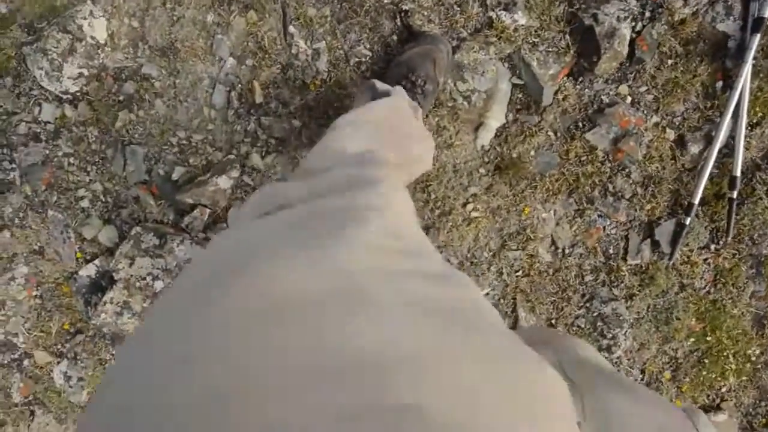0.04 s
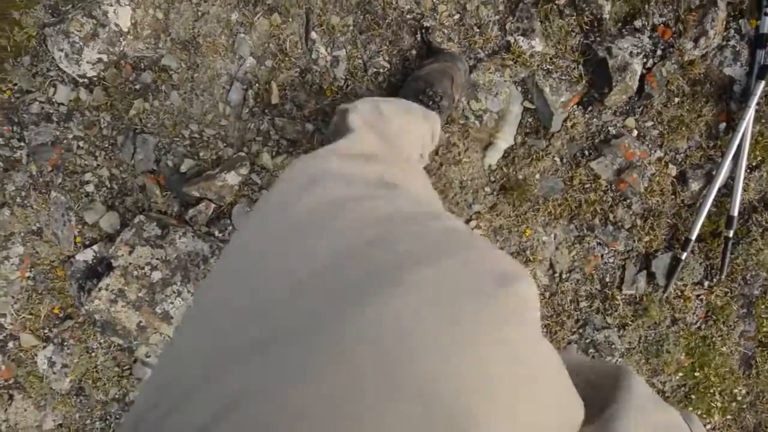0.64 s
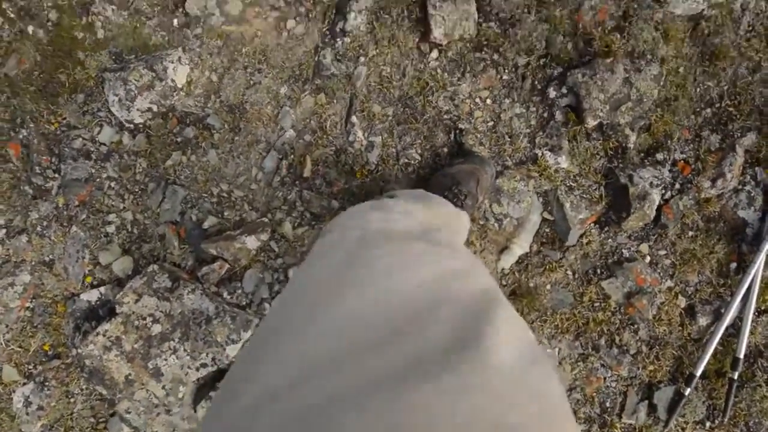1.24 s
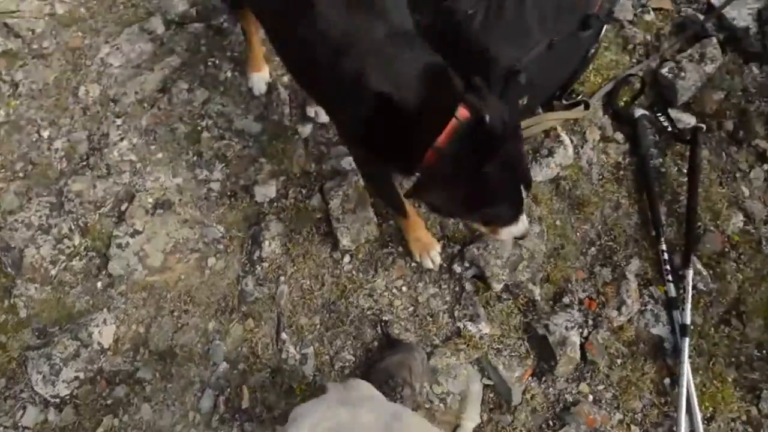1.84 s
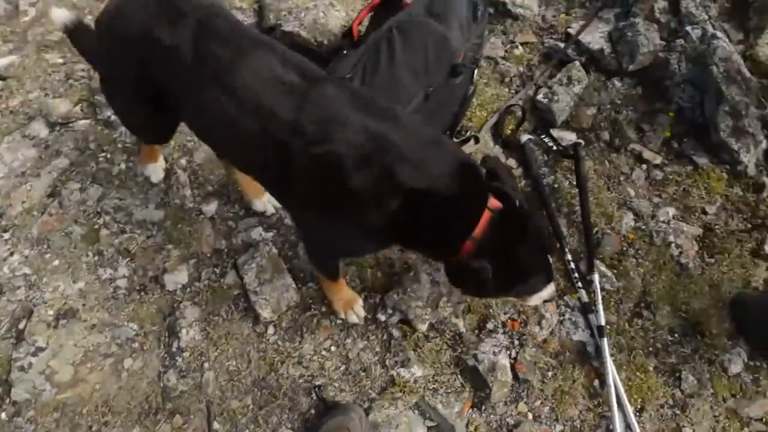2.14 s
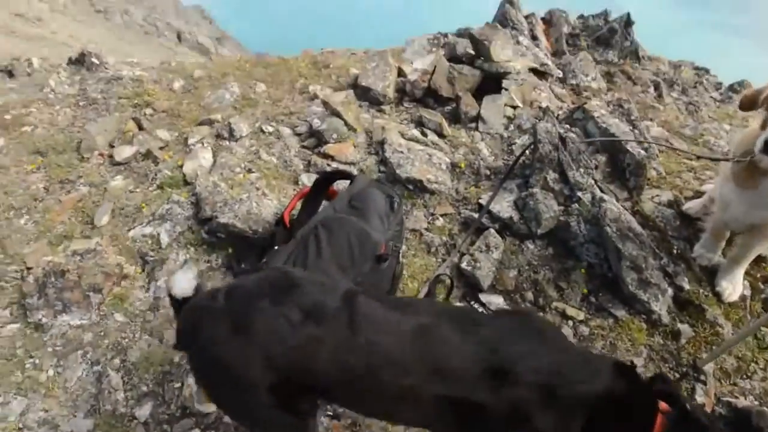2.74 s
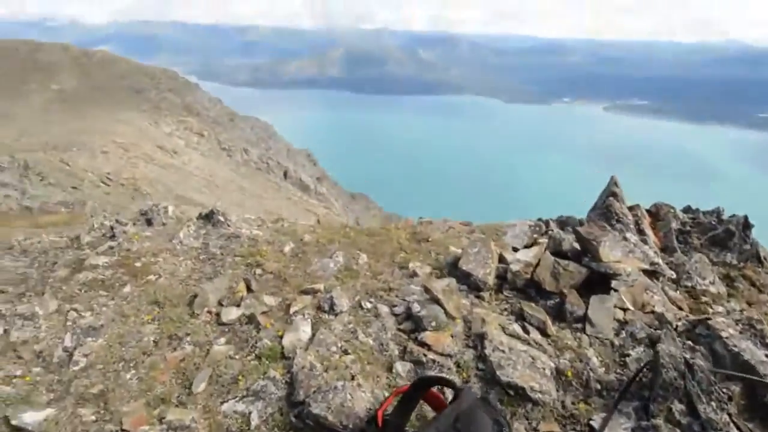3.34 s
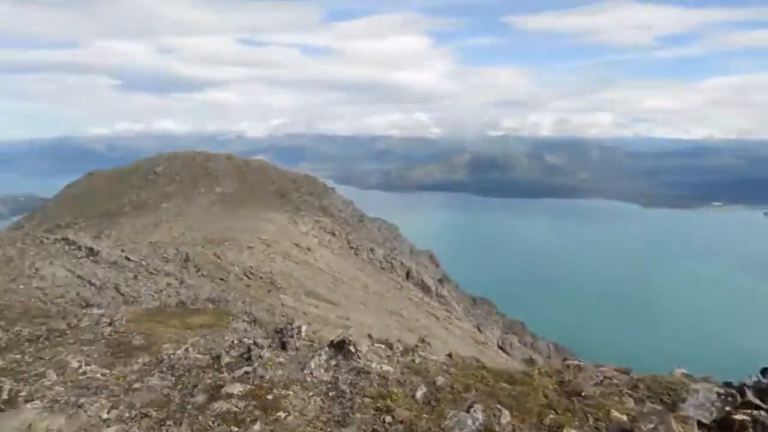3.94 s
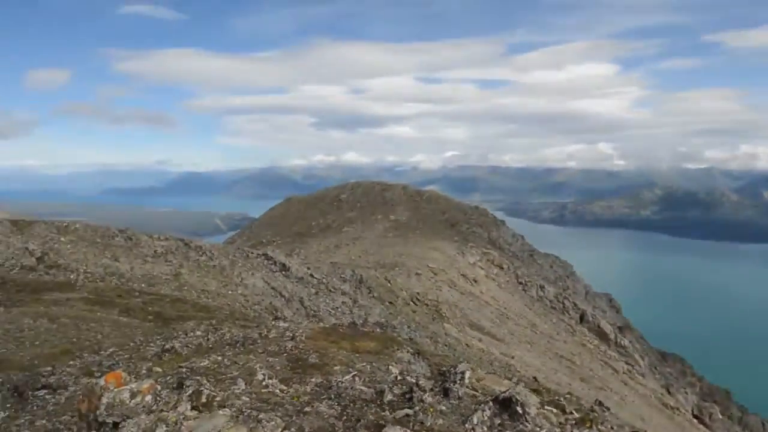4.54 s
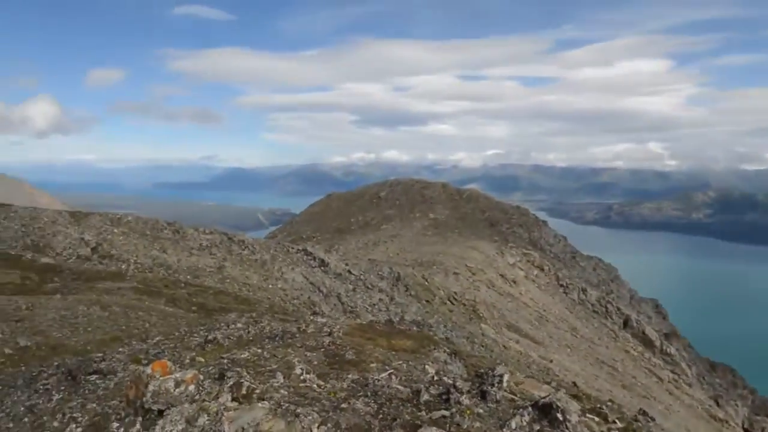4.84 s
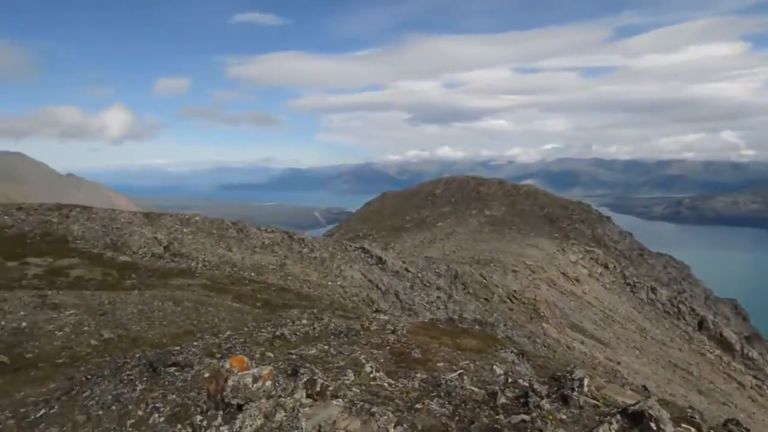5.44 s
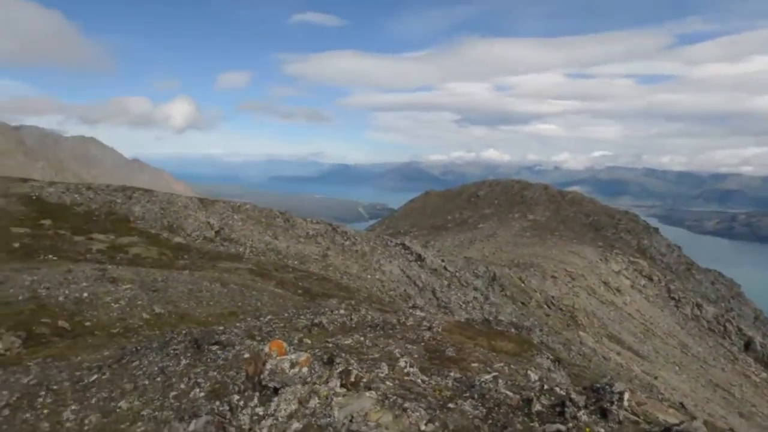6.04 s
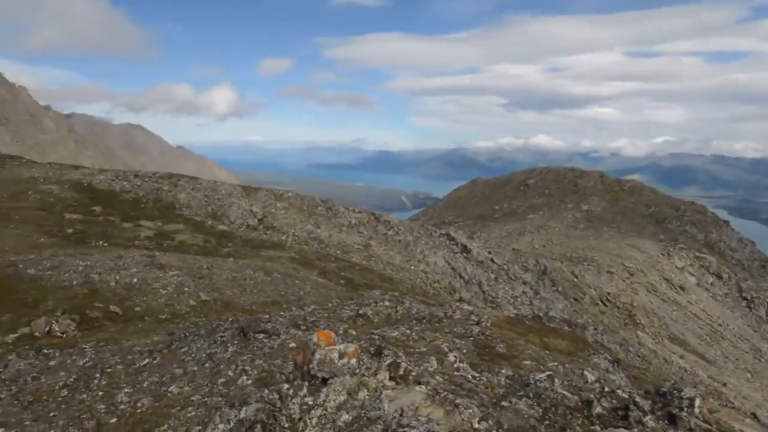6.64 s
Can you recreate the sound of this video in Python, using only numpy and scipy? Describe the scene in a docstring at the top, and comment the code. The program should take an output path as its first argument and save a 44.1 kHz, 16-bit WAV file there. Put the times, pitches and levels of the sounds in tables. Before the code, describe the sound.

Wind rumbles and thumps on the microphone, building to a loud, fluttering roar, with a few faint clinks of a dog's collar midway.

```python
"""Wind on a bare mountain top blows across the microphone of a hand-held camera.
From the start, slow eddies rumble and single buffets thump over the hiss of air on the rocks.
From 2.9 to 4.4 s a dog's collar clinks faintly. As the wind rises the flow tears off the
microphone port: short rips from 3.4 s, a surging hiss from 4.4 s, a fluttering roar from 5.7 s."""
import sys
import numpy as np
from scipy import signal
from scipy.fft import rfft, irfft
from scipy.io import wavfile
from scipy.ndimage import uniform_filter1d

SR = 44100
rng = np.random.default_rng(int(sys.argv[2]) if len(sys.argv) > 2 else 0)


def generate_wav(sig):
    """Save sig (samples, or channels by samples) to the path in sys.argv[1] as 16-bit PCM at SR."""
    pcm = np.round(np.clip(np.atleast_2d(sig).T, -1, 1) * 32767).astype(np.int16)
    wavfile.write(sys.argv[1], SR, pcm)


N = 295470
TIME_S = np.arange(N) / SR
FREQ_HZ = np.maximum(np.arange(N // 2 + 1) * SR / N, 1)

# Table levels are ahead of each source's trims. Spectra are relative.
# Steady wind between buffets: time_s, rumble_db, churn_db
STEADY_WIND = [(0, -23, -35), (.4, -25.5, -23.5), (.55, -22, -31), (1.15, -24.5, -24.5), (1.33, -32, -34.5),
               (1.6, -29, -28.5), (1.85, -35, -31.5), (2.3, -23, -32), (2.5, -26.5, -34.5),
               (2.8, -26, -30.5), (3.05, -28.5, -31.5), (3.8, -27, -34.5), (4.12, -25.5, -43),
               (4.28, -26.5, -45), (4.45, -15.5, -28.5), (5.1, -17.5, -18.5), (5.6, -23, -24),
               (5.67, -15.5, -23.5), (5.78, -20, -14), (6.2, -25, -15.5), (6.7, -25.5, -15)]
# Eddies hitting the microphone: start_s, length_s, level_db, corner_hz, rumble_db
EDDY_HITS = [(0.003, 0.027, -7.5, 740, -14), (0.259, 0.038, -30, 230, -22), (0.335, 0.036, -17, 330, -20.5),
             (0.413, 0.029, -15.0, 450, -36), (0.449, 0.0099, -6, 1060, -14), (0.619, 0.025, -16, 118, -34),
             (0.748, 0.021, -14.0, 710, -38), (0.85, 0.008, -7.5, 373, -15), (0.87, 0.026, -22, 190, -21),
             (1.03, 0.02, -29, 200, -21), (1.196, 0.036, -11.5, 715, -15), (1.238, 0.031, -12.0, 543, -15),
             (1.422, 0.017, -8, 272, -17.5), (1.458, 0.026, -13, 910, -13.5),
             (1.505, 0.02, -13, 318, -13.5), (1.677, 0.013, -7, 1260, -33), (1.699, 0.025, -14.5, 595, -24),
             (1.795, 0.011, -12.5, 133, -34), (1.914, 0.047, -18, 334, -20), (1.961, 0.017, -11, 600, -15),
             (1.991, 0.047, -12.0, 736, -21), (2.068, 0.013, -15.5, 370, -35), (2.1, 0.0088, -11, 386, -33),
             (2.123, 0.034, -12, 570, -19.5), (2.232, 0.022, -9.5, 900, -22), (2.277, 0.033, -13, 427, -16),
             (2.394, 0.023, -15, 388, -21.5), (2.428, 0.035, -12.5, 416, -31),
             (2.584, 0.018, -12.5, 530, -15.5), (2.691, 0.068, -18, 482, -25), (2.772, 0.01, -10, 560, -22),
             (2.823, 0.014, -12.5, 455, -19.5), (2.867, 0.022, -19, 292, -17.0),
             (2.921, 0.004, -5.5, 474, -31), (2.949, 0.022, -11.5, 980, -11.5),
             (3.072, 0.0074, -14.5, 405, -23), (3.157, 0.027, -22, 250, -19.5),
             (3.23, 0.024, -11, 397, -13.5), (3.308, 0.0046, -10, 1130, -12.5),
             (3.318, 0.044, -14.5, 740, -15.5), (3.399, 0.02, -6.5, 1050, -13),
             (3.47, 0.018, -14, 654, -37), (3.53, 0.026, -16, 453, -21), (3.618, 0.025, -13.5, 760, -20.5),
             (3.661, 0.0053, -5, 795, -30), (3.71, 0.0045, -6.5, 1110, -12),
             (3.763, 0.0082, -7.5, 785, -12.5), (3.794, 0.024, -11.5, 950, -19.5),
             (3.824, 0.066, -14.5, 730, -27.0), (3.918, 0.034, -10.5, 1290, -20.5),
             (4, 0.023, -12.5, 475, -33.5), (4.048, 0.026, -14.5, 544, -21.5),
             (4.154, 0.024, -14.5, 650, -16), (4.217, 0.021, -10.5, 116, -20),
             (4.314, 0.0076, -13, 422, -29.5), (4.335, 0.015, -10.5, 545, -21),
             (4.366, 0.018, -10, 467, -13.5), (4.4, 0.04, -12, 1080, -18), (4.457, 0.041, -17.5, 137, -16),
             (4.541, 0.018, -14, 169, -25), (4.577, 0.021, -11.5, 1690, -20),
             (4.607, 0.028, -7.5, 500, -34), (4.645, 0.013, -18, 260, -34), (4.766, 0.023, -17, 1520, -17),
             (4.82, 0.02, -18, 1330, -19), (4.858, 0.026, -12, 1530, -20), (5.059, 0.09, -15, 1880, -25.5),
             (5.262, 0.028, -16.5, 1550, -15.5), (5.312, 0.027, -11, 830, -21),
             (5.434, 0.024, -9.5, 1810, -13.5), (5.485, 0.014, -10, 1740, -29.0),
             (5.511, 0.025, -19.5, 1720, -20.5), (5.546, 0.017, -17, 1210, -13.5),
             (5.58, 0.046, -21, 1970, -26)]
# Torn flow at the port: time_s, level_db, corner_hz
TORN_FLOW = [(4.4, -35.5, 900), (4.8, -29, 1190), (4.99, -40, 1270), (5.08, -25, 1390), (5.21, -33, 1330),
             (5.58, -34, 1250), (5.67, -42, 795), (5.72, -31, 1700), (5.78, -20, 2850), (5.9, -22.5, 3450),
             (6.25, -21, 5450), (6.7, -20, 7340)]
TEAR_START_S = TORN_FLOW[0][0]


def undb(db):
    """Decibels to gain."""
    return 10 ** (np.asarray(db) / 20)


def unit(x):
    """Scale to rms 1."""
    return x / np.sqrt(np.mean(x ** 2) + 1e-18)


def curves(table):
    """Table columns, interpolated linearly over time."""
    time_s, *columns = np.transpose(table)
    return [np.interp(TIME_S, time_s, column) for column in columns]


def noise(spectrum):
    """Noise of rms 1 shaped by (freq_hz, level_db) points, rolled off beyond both ends."""
    hz, db = np.transpose(spectrum)
    gain = undb(np.interp(np.log(FREQ_HZ), np.log(hz), db))
    skirts = np.minimum(hz[-1] / FREQ_HZ, 1) * np.minimum(FREQ_HZ / hz[0], 1)
    return unit(irfft(rfft(rng.standard_normal(N)) * gain * skirts ** 2, N))


def steady(x, span_s):
    """Even out swells slower than span_s; keep the fast grain."""
    size = max(int(span_s * SR), 2)
    power = uniform_filter1d(uniform_filter1d(x ** 2, size), size)
    return x / np.sqrt(power + 1e-12)


def flutter(slow_hz, fast_hz):
    """Random wobble between two rates, rms 1."""
    gain = 1 / np.sqrt((1 + (slow_hz / FREQ_HZ) ** 4) * (1 + (FREQ_HZ / fast_hz) ** 4))
    return unit(irfft(rfft(rng.standard_normal(N)) * gain, N))


def swell(t, length_s, rise_s, fall_s):
    """Envelope flat from 0 to length_s, with exponential skirts."""
    return np.exp(np.minimum(t, 0) / rise_s - np.maximum(t - length_s, 0) / fall_s)


def settle(x, fall_per_s):
    """Follow x up at once, down at a limited rate."""
    return np.maximum.accumulate(x + fall_per_s * TIME_S) - fall_per_s * TIME_S


def add(out, x, first):
    """Mix x into out from sample first on."""
    a, b = max(first, 0), min(first + len(x), N)
    if b > a:
        out[a:b] += x[a - first:b - first]


def vortex(t, hz, angle_rad):
    """Pressure swing of a vortex passing at t = 0; smaller ones sound higher."""
    return np.real(np.exp(1j * angle_rad) / (1 - 2j * np.pi * hz * t) ** 2)


def ground_hiss(flicker_db=1.0, tick_count=60, tick_s=0.0046):
    """Air over rocks and grass, with faint scratchy ticks."""
    # Rush of air: time_s, level_db
    levels = [(0, -27), (.3, -27), (.55, -27), (.78, -24.5), (.92, -26.5), (1.15, -29.5), (1.5, -32.5),
              (1.87, -31), (2.8, -34.5), (3.2, -35.5), (3.5, -39), (4.1, -42.5), (4.5, -37), (5.5, -38.5),
              (5.66, -46)]
    # Hiss spectrum: freq_hz, level_db
    spectrum = [(200, -7.5), (800, 20.5), (1500, 15), (2200, 11), (3500, 5), (6000, 1.5), (8500, -0.5),
                (10000, 2), (11200, -5), (12500, -11), (15500, -25)]
    level_db, = curves(levels)
    grain, t = np.ones(N), np.arange(SR // 20) / SR
    for when, scatter in zip(rng.random(tick_count), rng.standard_normal(tick_count)):
        tick = .5 * undb(2 - 0.5 * scatter) * np.exp(-t / tick_s)
        add(grain, tick, int(when * N))
    return noise(spectrum) * grain * undb(level_db + flicker_db * flutter(4, 48))


def duck(wind, above_db=-15, slope=1.235, recover_db_per_s=43, sense_s=0.0032):
    """Gain that drops at once under loud wind and recovers at a steady rate."""
    power = np.abs(uniform_filter1d(wind ** 2, int(sense_s * SR)))
    excess_db = np.maximum(10 * np.log10(power + 1e-12) - above_db, 0)
    return undb(-settle(slope * excess_db, recover_db_per_s))


def collar_clinks(t60_s=0.038, spread_hz=250, mode_count=8):
    """Small metal piece on the collar: close modes, quickly damped."""
    # Metal strikes: start_s, level_db, pitch_hz
    strikes = [(2.868, -28, 9900), (2.880, -30, 10600), (2.940, -30, 10350), (2.957, -30, 10100),
               (3.350, -38, 10200), (3.365, -37, 10000), (3.955, -32, 6400), (4.010, -32, 6550),
               (4.344, -24, 3700), (4.346, -29, 5300), (4.350, -29, 9900)]
    out, t = np.zeros(N), np.arange(SR // 10) / SR
    decay = np.exp(-np.log(1000) * t / t60_s)
    for start_s, level_db, pitch_hz in strikes:
        modes_hz = pitch_hz + spread_hz * rng.standard_normal(mode_count)
        ring = np.sin(2 * np.pi * np.outer(modes_hz, t)).mean(axis=0)
        add(out, undb(level_db) * ring * decay, int(start_s * SR))
    return out


def crackle(count=800, centre_hz=500, top_hz=1000, tighten_per_s=0.56, spread=0.12, scatter_db=5):
    """Small vortices at random times; they grow with the churn and tighten once the flow tears."""
    out, t = np.zeros(N), np.arange(-SR // 200, SR // 200) / SR
    _, churn_db = curves(STEADY_WIND)
    typical_db = np.minimum(churn_db + 6.5, -13)
    tearing_s = np.maximum(TIME_S - TEAR_START_S, 0)
    typical_hz = np.minimum(centre_hz * np.exp(tighten_per_s * tearing_s), top_hz)
    for (when, turn), (strength, tight) in zip(rng.random((count, 2)), rng.standard_normal((count, 2))):
        i = int(when * N)
        pulse = vortex(t, typical_hz[i] * np.exp(spread * tight), 2 * np.pi * turn)
        add(out, undb(typical_db[i] + scatter_db * min(strength, 2)) * pulse, i - len(t) // 2)
    return out


def turbulence(speed, churn_flutter_db=3, eddy_trim_db=1.5):
    """Large eddies rumble and swell around each buffet; smaller ones churn with the air speed."""
    # Steady rumble spectrum: freq_hz, level_db
    rumble_spectrum = [(20, -30), (28, -11), (45, -10), (80, -2.5), (125, -5), (180, -10.5), (280, -17),
                       (600, -36)]
    # Spectrum of the rumble around a buffet: freq_hz, level_db
    eddy_spectrum = [(20, -31), (30, -21), (45, -8.5), (80, -1.5), (130, -3), (190, -3), (290, -12),
                     (600, -38)]
    # Small-eddy spectrum: freq_hz, level_db
    churn_spectrum = [(70, -13), (130, -1.5), (200, 3), (350, 1.5), (600, -1.5), (1000, -11), (1500, -20.5),
                      (2500, -71), (5000, -58)]
    rumble_db, churn_db = curves(STEADY_WIND)
    eddy_power, t = np.zeros(N), np.arange(-SR // 10, SR // 5) / SR
    for start_s, length_s, _, _, eddy_db in EDDY_HITS:
        envelope = undb(eddy_db + eddy_trim_db) * swell(t, length_s, rise_s=0.012, fall_s=0.012)
        add(eddy_power, envelope ** 2, int((start_s + t[0]) * SR))
    eddies = steady(noise(eddy_spectrum), span_s=0.0097) * np.sqrt(eddy_power)
    rumble = steady(noise(rumble_spectrum), span_s=0.06) * undb(rumble_db)
    churn = noise(churn_spectrum) * undb(churn_flutter_db * speed)
    return rumble + eddies + steady(churn, span_s=0.035) * undb(churn_db)


def buffets(trim_db=-0.78, low_hz=100, knee_hz=330, steepness=5.56, lump_db=4.5):
    """Each eddy is a lumpy puff of pressure noise; faster ones reach higher in frequency."""
    size, lead = 8192, 2048  # samples
    out, lumps = np.zeros(N), undb(lump_db * flutter(23.3, 125))
    hz = np.arange(size // 2 + 1) * SR / size
    t = (np.arange(size) - lead) / SR
    body = (hz / low_hz) ** 4 / (1 + (hz / low_hz) ** 4) / (1 + hz / knee_hz)
    for start_s, length_s, level_db, corner_hz, _ in EDDY_HITS:
        first = int(start_s * SR) - lead
        power = body / (1 + (hz / corner_hz) ** steepness)  # viscosity kills the smallest whirls
        puff = irfft(rfft(rng.standard_normal(size)) * np.sqrt(power), size)
        puff *= swell(t, length_s, rise_s=0.00087, fall_s=0.0034)
        puff *= lumps.take(first + np.arange(size), mode="wrap")
        rms = np.sqrt(np.sum(puff ** 2) / (length_s * SR))
        add(out, puff / rms * undb(level_db + trim_db), first)
    return out


def snaps(trim_db=-1, wake_s=0.001013, wake_db=-6):
    """A strong vortex crosses the port; a weaker one spins the other way in its wake."""
    # Hardest vortices: time_s, level_db, centre_hz
    vortices = [(0.454, 0, 504), (1.2611, -4.5, 970), (1.461, 1, 570), (1.682, -1.5, 560), (2.13, -8, 470),
                (1.9715, -3.5, 520), (2.2489, -3.5, 654), (2.7763, -4, 330), (2.9255, -5, 330),
                (2.951, -2.5, 500), (3.3111, 5, 526), (3.3446, 3, 400), (3.4032, 3, 646), (3.629, -1, 410),
                (3.663, -7, 450), (3.713, 1, 483), (3.769, -2.5, 477), (3.8069, 4, 433), (3.9459, 2.5, 536),
                (4.4074, 4.5, 750), (4.421, 5.5, 754), (4.585, -5, 860), (4.7368, -3.5, 470),
                (4.8339, 1.5, 780), (4.9552, -7, 955), (5.0913, -3, 1090), (5.187, -10, 1080),
                (5.2876, 2, 686), (5.6224, -4.5, 750), (5.724, 5.5, 796)]
    out, t = np.zeros(N), np.arange(-SR // 100, SR // 100) / SR
    for time_s, level_db, centre_hz in vortices:
        turn, lag = rng.random(2)
        angle_rad = 2 * np.pi * turn
        leader = vortex(t, centre_hz, angle_rad)
        wake = undb(wake_db) * vortex(t - wake_s * (.5 + lag), centre_hz, angle_rad)
        add(out, undb(level_db + trim_db) * (leader - wake), int((time_s + t[0]) * SR))
    return out


def rips(trim_db=4.5, sputter_db=7.0, fade_s=0.02, crack_s=0.00067):
    """Single gusts tear the flow loose: bright bursts that open with a crack and sputter out."""
    # Tear-offs: start_s, length_s, level_db
    bursts = [(3.404, 0.0034, -36), (3.944, .003, -32), (4.412, .0036, -37), (4.585, .009, -25.5),
              (4.613, 0.0087, -15), (4.634, 0.014, -32.5), (4.779, 0.0042, -30), (4.829, 0.0073, -25.5),
              (4.873, 0.0085, -23.5), (5.045, 0.0061, -23.5), (5.066, 0.0097, -21.5), (5.081, 0.017, -19.5),
              (5.111, 0.0027, -15), (5.121, 0.024, -21), (5.264, 0.0017, -26), (5.287, 0.0063, -23.5),
              (5.366, 0.0017, -27.5), (5.386, 0.0017, -31.5), (5.441, 0.013, -19.5), (5.49, 0.015, -24),
              (5.512, 0.0049, -27), (5.522, .011, -23), (5.553, 0.011, -27.5), (5.619, 0.0079, -29),
              (5.717, 0.0048, -23), (5.746, 0.0084, -19), (5.765, .01, -21.5), (5.795, 0.011, -17),
              (5.827, 0.0088, -13), (5.853, 0.022, -15.5), (5.879, .006, -15.5), (5.923, 0.0034, -12),
              (5.95, 0.0095, -18), (5.98, 0.0016, -12), (5.997, 0.02, -17.5), (6.051, 0.004, -20),
              (6.1, .016, -18.5), (6.142, 0.004, -9), (6.163, 0.012, -14.5), (6.26, 0.023, -20.5),
              (6.359, 0.014, -20), (6.494, .0074, -15.5), (6.676, 0.0053, -15)]
    # Rip spectrum: freq_hz, level_db
    spectrum = [(400, 6.5), (1200, 0), (2200, 0.5), (4000, -4), (7000, -15.5), (10000, -18), (12500, -33.5),
                (15500, -49)]
    envelope, t = np.zeros(N), np.arange(-SR // 100, SR // 10) / SR
    crack = 1 + 0.94 * np.exp(-np.abs(t) / crack_s)
    for start_s, length_s, level_db in bursts:
        gate = swell(t, length_s, rise_s=0.00008, fall_s=0.00038)
        fade = np.exp((length_s / 2 - np.clip(t, 0, length_s)) / (fade_s + length_s))
        add(envelope, undb(level_db + trim_db) * gate * fade * crack, int((start_s + t[0]) * SR))
    sputter = undb(sputter_db * settle(flutter(94, 410), fall_per_s=900))
    return steady(noise(spectrum) * sputter, span_s=0.014) * envelope


def torn_flow(speed, trim_db=5.0, surge_octaves=0.55, steepness=5.6, swing_db=8.0, onset_s=0.039):
    """The stream tears off the port and roars; each surge of speed makes it louder and brighter."""
    # Roar spectrum: freq_hz, level_db
    spectrum = [(300, -11.5), (800, 4.5), (1500, 1.5), (2500, -1), (4500, -2.5), (7000, -5.5),
                (10000, -6.5), (12500, -18), (15500, -28)]
    level_db, base_corner_hz = curves(TORN_FLOW)
    spit = 0.66 * flutter(120, 320)  # tiny eddies
    surge = settle(unit(speed + spit), fall_per_s=450)  # tears at once, settles more slowly
    surge -= surge.mean()
    corner_hz = base_corner_hz * 2 ** (surge_octaves * surge)
    bins, roar = rfft(noise(spectrum)), np.zeros(N)
    centres_hz = 250 * 2. ** np.arange(7)
    # Moving low-pass, built from octave bands
    for hz, weights in zip(centres_hz, np.eye(len(centres_hz))):
        band = irfft(bins * np.interp(np.log(FREQ_HZ), np.log(centres_hz), weights), N)
        roar += band / np.sqrt(1 + (hz / corner_hz) ** steepness)
    onset = np.clip((TIME_S - TEAR_START_S) / onset_s, 0, 1)
    return onset * roar * undb(level_db + trim_db + swing_db * np.tanh(surge / 2))


def scene(headroom=1.41):
    """One air speed drives churn and torn flow; big pressure swings round off; the hiss ducks."""
    speed = flutter(23, 146)
    pressure = turbulence(speed) + buffets() + crackle()
    rounded = headroom * np.tanh(pressure / headroom)
    wind = rounded + snaps() + torn_flow(speed) + rips()
    return (wind + ground_hiss() * duck(wind) + collar_clinks())[None]


def record(dry, clip_level=0.95, crack_top_hz=10500, top_hz=15725):
    """The strongest peaks overload the input with a small, softened crack; the top is cut."""
    overload = np.clip(dry, -clip_level, clip_level) - dry
    crack = signal.sosfilt(signal.butter(2, crack_top_hz, fs=SR, output="sos"), overload)
    top_cut = signal.ellip(8, .2, 70, top_hz, fs=SR, output="sos")
    return signal.sosfilt(top_cut, dry + crack)


dry = scene()
out = record(dry)
generate_wav(out)
```